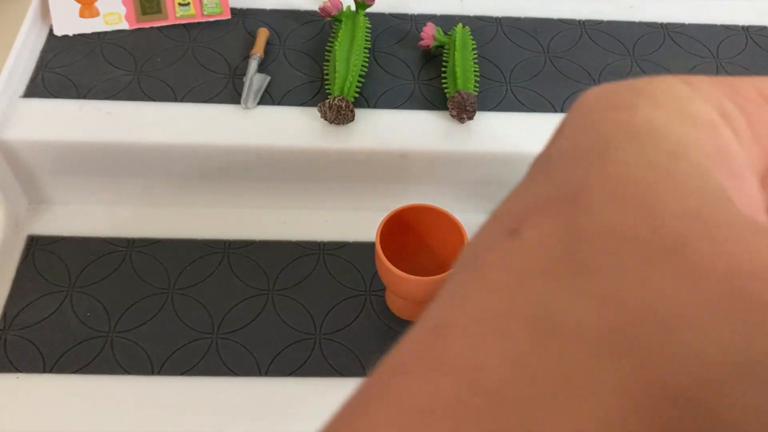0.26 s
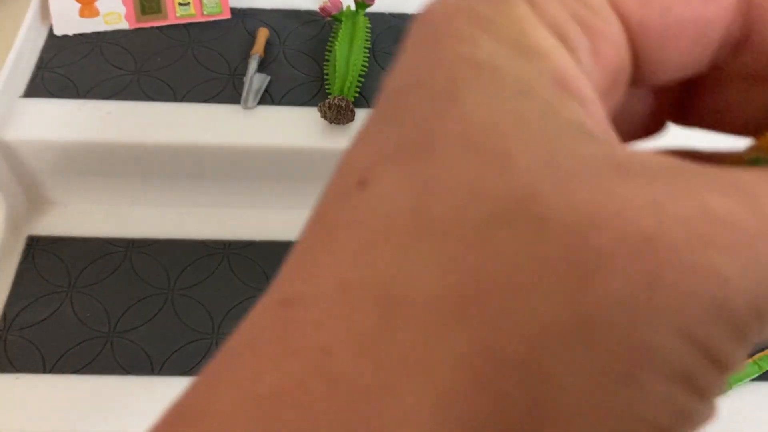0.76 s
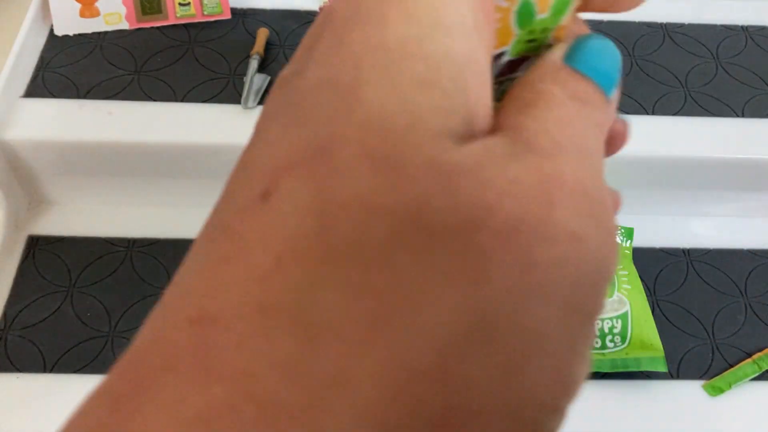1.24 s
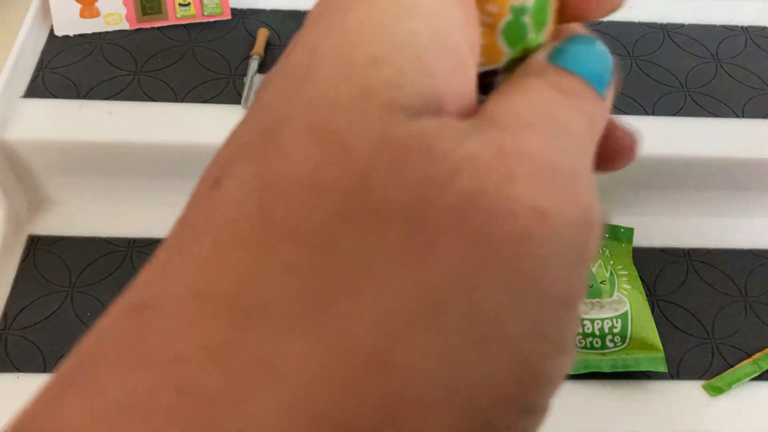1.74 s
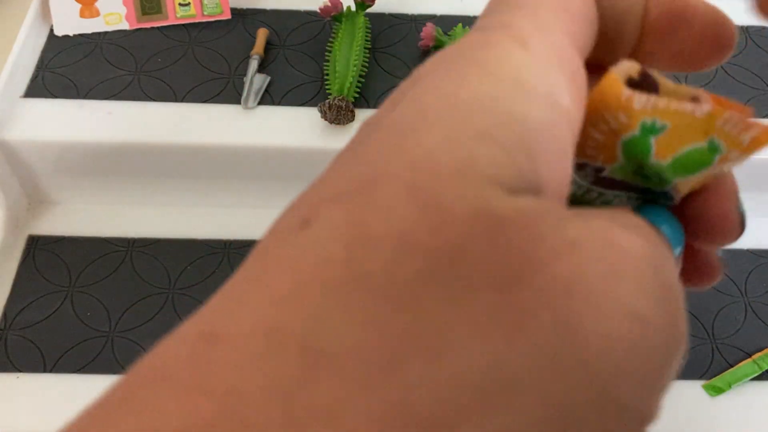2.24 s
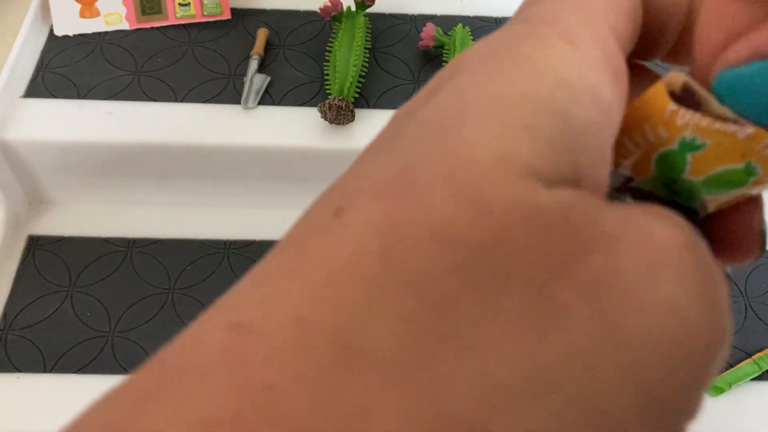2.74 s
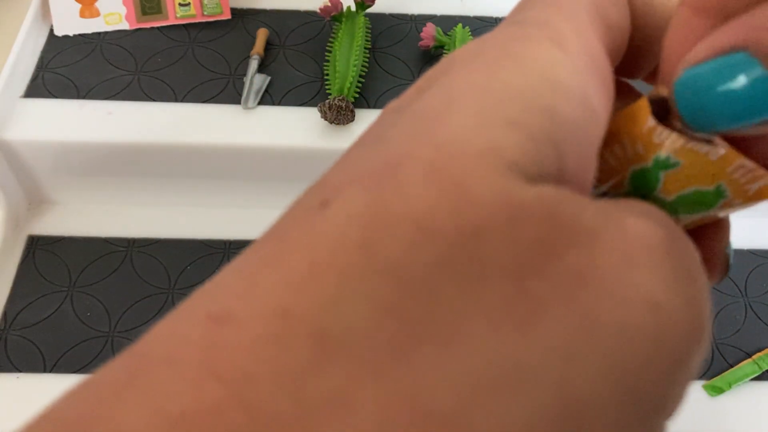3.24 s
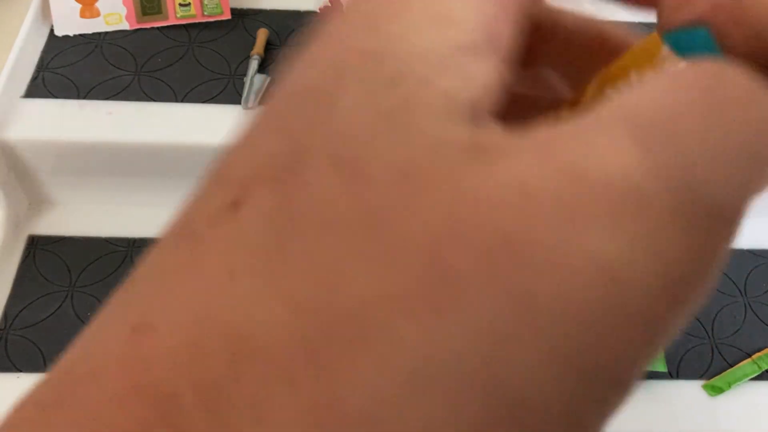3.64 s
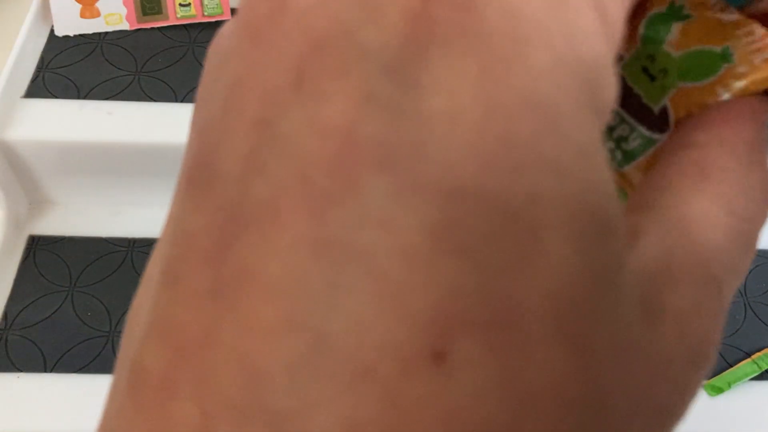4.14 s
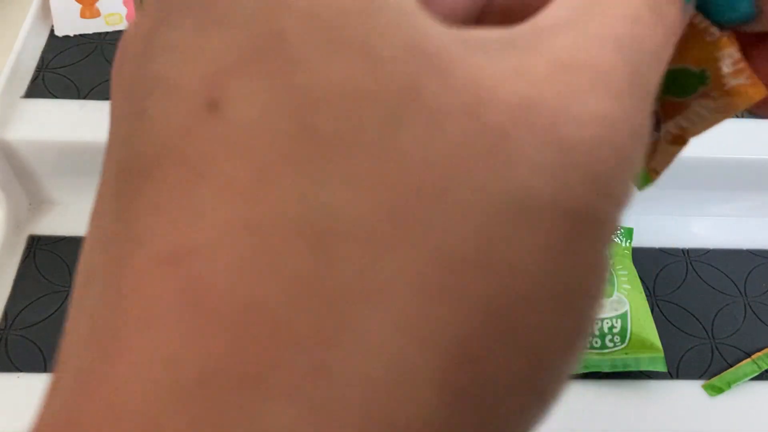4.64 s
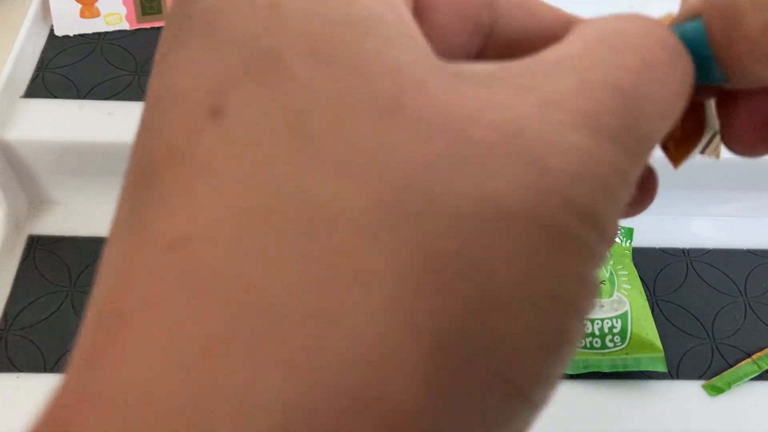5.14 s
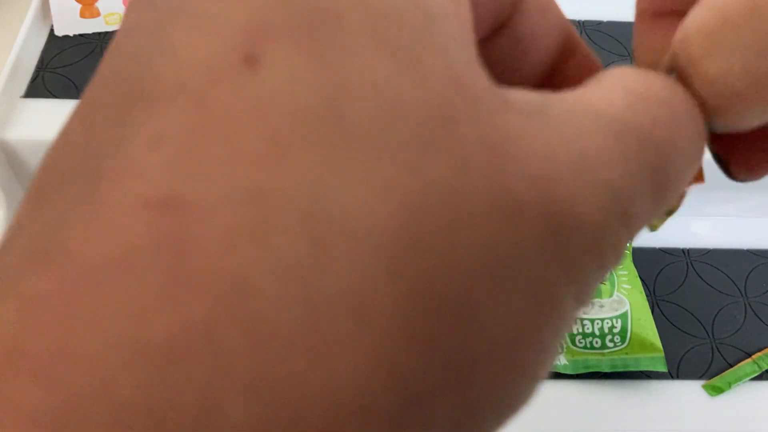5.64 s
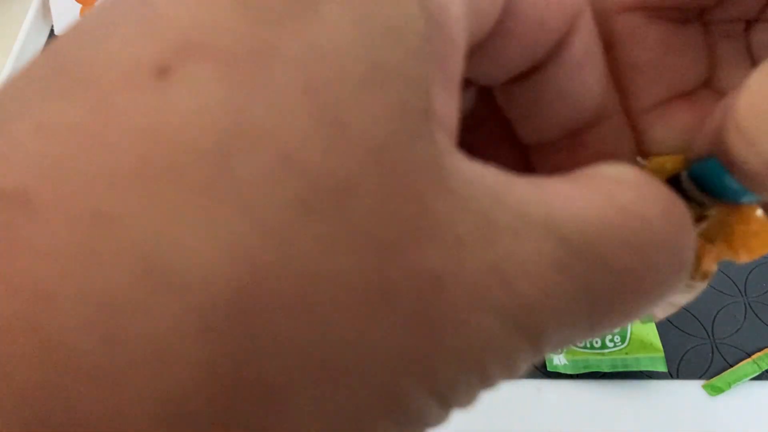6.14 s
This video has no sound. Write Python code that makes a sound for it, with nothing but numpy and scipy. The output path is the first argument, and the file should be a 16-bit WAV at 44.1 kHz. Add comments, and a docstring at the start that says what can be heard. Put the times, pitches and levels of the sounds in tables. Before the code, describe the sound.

A quiet indoor room with a low, gently swelling rumble and very faint hiss, heard by two close microphones. From 0 s fingers crease a small plastic packet: thin, bright ticks, with crisp stronger snaps near 0.1 and at 0.25-0.3 s. At about 0.73 s a hand knocks the table, the loudest event, short and woody, with a dense crackle and little scuffs until 0.9. Around 1.15-1.35 s softer bumps and scuffs mix with more rustling. From 1.4 to 2.1 s small snaps come in irregular strings. A faint soft rub passes near 2.2, a short low pop at 2.74 within a crinkle cluster. Sharp snaps gather around 3.1-3.3 and 3.6 s, then 4.1-4.65 s. A clear bright click lands at 4.97, another at 5.19; sparse dry ticks continue to the end near 6.4 s. The reflections are short and slight.

```python
"""Quiet room, two microphones: fingers work a small plastic packet close by.
Creases snap, some with an echo, as short forces ringing four groups of resonances; tiny folds rustle.
Mostly early on a hand knocks and scuffs the table; later come a soft rub and a short low pop:
shaped noise bursts wake a bank of modes. Shaped noise gives a low, swelling rumble with faint hiss;
sparse reflections add a short tail."""
import sys
import numpy as np
from scipy import signal
from scipy.fft import rfft, irfft, next_fast_len
from scipy.io import wavfile
from scipy.ndimage import uniform_filter1d

SR = 44100
rng = np.random.default_rng(int(sys.argv[2]) if len(sys.argv) > 2 else 0)


def dump(signal):
    """Clip the signal to [-1, 1] and save it as 16-bit WAV at the path in sys.argv[1]."""
    limited = np.clip(np.atleast_2d(signal).T, -1, 1)
    pcm = np.round(limited * 32767).astype(np.int16)
    wavfile.write(sys.argv[1], SR, pcm)


N = 281622

# Room noise spectrum, relative density: f/Hz, level/dB
RUMBLE_SPECTRUM = [(20, -37.5), (35, -12.5), (56, -5.5), (80, 6), (95, -4), (114, -14.5), (158, -11),
                   (300, -20), (500, -27.5), (750, -40), (1200, -43.5), (5000, -52), (8000, -48.5),
                   (12000, -54.5), (16500, -63)]
# Slow swell of the deep rumble, only departures from the mean count: t/s, level/dB
RUMBLE_SWELL = [(0, -52), (.4, -53), (1.102, -52.5), (2, -54.5), (3.001, -57), (3.202, -53.5),
                (3.601, -57.5), (4.4, -53.5), (4.998, -56.5), (5.35, -53), (6.39, -57)]
# Left-right likeness of diffuse sound: f/Hz, likeness
LIKENESS = [(60, 0.93), (240, 0.82), (950, 0.1), (3770, 0.23), (15000, 0.14)]
# Decay of the room tail: f/Hz, t60/s
ROOM_DECAY = [(500, 0.15), (2000, 0.13), (8000, 0.25), (15000, 0.067)]
# Mostly early knocks and scuffs on the table, later a soft rub and a short low pop:
# t/s, relative level/dB, burst length/ms, touch pitch f/Hz
LOW_BLOWS = [(0.503, -55.5, 9.8, 500), (0.714, -26.5, 15, 1300), (0.7254, -19, 9, 1270),
             (0.729, -17.5, 5.3, 460), (0.735, -26.5, 37, 195), (.7500, -26, 10, 83), (.7560, -35, 13, 800),
             (0.763, -42, 17, 220), (.7850, -37.5, 39, 866), (0.845, -41, 8.8, 476),
             (0.871, -40.5, 19, 74.4), (0.881, -54, 90, 490), (1.127, -52.5, 100, 567),
             (1.148, -39, 225, 75), (1.226, -38.5, 12.4, 685), (1.241, -40.5, 33, 406),
             (1.264, -35, 3.6, 880), (1.279, -41, 14.5, 278), (1.329, -47, 12.4, 680),
             (2.181, -62.5, 220, 457), (2.737, -46.5, 2.35, 406)]
# Modes of the table: f/Hz, level/dB, t60/s (limited to 0.02-0.3 in use)
TABLE_MODES = [(78.6, -13.5, 0.33), (141, -16, .12), (237, 6, 0.31), (301, 0.5, 0.054), (498, 1.5, 0.061),
               (626, -0.5, 0.034), (713, 3.5, .1), (850, -3, 0.22), (833, -8.5, 0.031), (1092, 6.5, 0.045),
               (1238, -6.5, 0.082), (1252.5, -14.5, .06), (1370, -14.5, 0.025), (1530, -11, 0.18),
               (1790, -5.5, 0.044), (2360, -0.5, 0.12)]
# Clear snaps of the film, some with an echo about 12 ms later: t/s, relative crease level/dB,
# pocket level re crease/dB, edge level re crease/dB, length/ms, pocket pitch f/Hz
SNAPS = [(0.0043, -42.5, -21, 2.5, 0.77, 1700), (0.045, -55, -21, 1, 4.9, 2000),
         (0.0637, -50, -12.5, 2.5, 6.3, 2000), (0.1139, -27, -18, -9, 5.8, 1400),
         (0.1196, -30.5, -7, 2, 3.4, 1150), (0.14, -56.5, 17, -12, 1.9, 1500),
         (0.165, -40.5, -16, 1, 1.7, 1520), (0.2403, -20.5, -31, -11, 0.37, 2270),
         (0.2877, -19.5, -18.5, -5.5, 2.7, 1490), (0.2942, -12, -23, -11.5, 6, 2370),
         (0.5026, -44, -4, -4, 15, 1370), (0.553, -50.5, -8, -12.5, 1.1, 1740),
         (0.5941, -47.5, -8.5, -10, 2.6, 1490), (0.6122, -47, -16.5, -3, 5.2, 1700),
         (0.7258, -18, -0.5, -1.5, 9.6, 1250), (0.7598, -34, 2, -16, 19, 1500),
         (0.7923, -26.5, -24, 4.5, 4, 1500), (0.8397, -32.5, -9.5, -12, 6.7, 1700),
         (0.8505, -40, -7, -19, 7.4, 1700), (1.1565, -53.5, -10.5, -1, 3.48, 1020),
         (1.2343, -32.5, -6.5, -9, 7.8, 1200), (1.2432, -32, -13, -22, 5.8, 1700),
         (1.2663, -36, 0.5, -19, 23, 1400), (1.3249, -44, -4, -24, 2.2, 1140),
         (1.3414, -36, -8.5, -12, 2.8, 1040), (1.363, -58.5, 9, -9, 2.984, 1600),
         (1.3806, -35, -3.5, -1.5, 1.2, 1820), (1.3986, -37, -1.5, -5, 1.5, 1810),
         (1.433, -47.5, 4, -1.5, 1.2, 1820), (1.535, -39, -22.5, 0, 1.3, 2420),
         (1.6292, -32, -10.5, -6.5, 2.7, 1700), (1.6338, -27, -23, -8.5, 0.84, 2260),
         (1.644, -44.5, -20.5, -7.5, 5.7, 1700), (1.7669, -54.5, 17.5, 3, 3, 1750),
         (1.7718, -40, -10.5, -7, 1.5, 1700), (1.781, -45, 2, 4, 4.1, 1700),
         (1.803, -43.5, 6, -8, 0.93, 2700), (1.8579, -49.5, 0, -6, 2.4, 1700),
         (1.8744, -40.5, -13, -3, 6.6, 2300), (1.9017, -43, -6, -3, 1.9, 1760),
         (1.975, -52, -12, -6, 2.6, 2500), (2.0191, -48, -12.5, -12, 1.6, 1700),
         (2.1075, -38.5, -15.5, -9.5, 1.4, 2600), (2.114, -29.5, -4, 3.5, 1.2, 2590),
         (2.4, -48.5, 13.5, -9, 1.3, 1300), (2.5468, -33, -22, -5.5, 1.04, 1410),
         (2.5769, -55.5, -2.5, -9, 3.4, 1030), (2.614, -37.5, -7.5, 2, 4.6, 1810),
         (2.6212, -37.5, 0, -12, 1.4, 1010), (2.6664, -50.5, -0.5, 0, 3, 2600),
         (2.677, -47, -1.5, 6.5, 1, 990), (2.6893, -50, -1, -8, 2.7, 1100), (2.727, -54, 5, -4, 3.4, 1030),
         (2.7344, -36, 10.5, 4.5, 1.3, 1860), (2.741, -29, -0.5, -2.5, 0.99, 1600),
         (2.8268, -52, -1.5, -7, 6.7, 1010), (2.89, -59.5, -3, -7, 3.08, 1700),
         (3.075, -29, -14.5, 0, 1.3, 1680), (3.0868, -31.5, -9.5, -3.5, 1.8, 1500),
         (3.108, -56.5, 13, -18.5, 2.7, 1460), (3.149, -70, 10, -8, 1.9, 1300),
         (3.1679, -42, 10.5, 0, 0.92, 1700), (3.245, -34.5, -5.5, 6, 0.67, 1050),
         (3.2565, -33.5, -9.5, -4, 2.7, 1700), (3.2898, -31.5, 5.5, -5, 1.6, 1600),
         (3.365, -59.5, -13, -4, 2, 1700), (3.508, -59.5, 4.5, -7, 4, 1620),
         (3.551, -52.5, 2.5, -22, 2.5, 1860), (3.5726, -52.5, 10, -18, 1.8, 1500),
         (3.6024, -32.5, -3.5, 7.5, 1.1, 1050), (3.607, -25, -2, -10, 1.17, 1620),
         (4.0255, -59, 2.5, -10, 2.9, 1820), (4.0998, -26, -14.5, -6, 1.2, 2360),
         (4.1913, -34, -5.5, -15, 1.16, 1810), (4.2435, -67, 13, -12.5, 1.1, 1100),
         (4.338, -36, -11.5, -9.5, 1.05, 1770), (4.3997, -57, 10.5, 5, 2.9, 1600),
         (4.4342, -58, -2, -14, 2, 1500), (4.469, -43, -3.5, 1.5, 5.7, 1270), (4.477, -40, 2, 3, 1.6, 1500),
         (4.502, -65, 6, -9, 3.3, 1600), (4.5787, -49.5, 0, -1, 3.8, 1000),
         (4.5865, -29.5, -15, -14.5, 1.5, 1700), (4.6088, -53, 11.5, 2, 1.9, 1400),
         (4.6148, -37, -22, -16.5, 2, 1710), (4.6433, -60, 12, 5, 2.75, 1600),
         (4.968, -20.5, -30, 1, 2.3, 1790), (5.1865, -29, -16.5, 0.5, 1.66, 1790),
         (5.3401, -45, 3, -0.5, 1.55, 1770), (5.707, -52, -2, -4, 2.2, 1770),
         (5.7293, -52, 5, -19.5, 2.3, 1600), (5.7493, -62, 20, -16, 0.84, 1550),
         (5.812, -61, 13.5, -16, 2.1, 1700), (5.828, -39, -14.5, -2.5, 1.6, 1670),
         (5.9757, -67.5, 16, -8.5, 2, 1600), (5.9919, -32, -15.5, 0, 1.4, 1600),
         (6.0077, -51.5, 16, -2.5, 3.6, 1500), (6.1085, -54.5, -30.5, 5.5, 2.7, 1700),
         (6.1722, -28.5, -21.5, -2.5, 1.3, 1710), (6.2407, -38, -18.5, 3.5, 2.8, 1520)]
# Finger activity: t/s, relative crackle level/dB, pocket level re crackle/dB
HANDLING = [(0, -66.5, -8), (.45, -70, -11), (.55, -62.5, -5.5), (0.698, -70.5, -10.5), (.75, -40.5, 3.5),
            (.94, -52.5, -14), (.99, -64, -16.5), (1.12, -66.5, -10.5), (1.26, -49, -5), (1.479, -73, -4),
            (1.699, -69.5, -13.5), (1.83, -53, -8), (2.08, -77, -12), (2.52, -87, -4.5),
            (2.681, -58.5, 1.5), (2.97, -91.5, -3), (3.201, -68, 1), (3.451, -87, -3.5), (3.56, -57, -3.5),
            (3.78, -99, -4.5), (4.061, -61.5, -14.5), (4.28, -73, -8), (4.47, -60.5, -3), (4.64, -77.5, 2),
            (4.79, -92, -25.5), (4.95, -68.5, -20), (5.62, -78.5, -17), (5.73, -70, -6.5),
            (6.0, -71.5, -11), (6.39, -87.5, -14)]
# Crease resonances: f/Hz, width/Hz, level/dB
CREASE_MODES = [(6500, 1500, -5), (7444, 2100, 4.5), (7440, 1300, 2.5)]
# Pocket resonances: f/pocket pitch, width/pocket pitch, level/dB
POCKET_MODES = [(1, 0.5, 3), (0.62, 0.46, -14.5)]
# Flat sheet resonances: f/Hz, width/Hz, level/dB
SHEET_MODES = [(3070, 890, 0.75), (3610, 900, 3.5), (4910, 460, 1.5)]
# Edge resonances: f/Hz, width/Hz, level/dB
EDGE_MODES = [(10465, 1000, 6.5), (11350, 1400, -4), (14520, 3000, -9.5)]
# Phase lead of the left microphone for the packet: f/Hz, lead/rad
LEFT_LEAD = [(0, -3), (1890, 1.09), (2760, 1.5), (3880, 1.49), (5080, 2), (5940, 1.29), (6460, -0.15),
             (8350, 1.23), (9730, -6.5), (10200, -4.5), (12500, -7), (14600, -12.5), (15000, -9.5),
             (16500, 8.5)]
# Balance for the packet: f/Hz, left minus right/dB
BALANCE = [(60, -3.5), (240, -2), (950, 0), (3770, 1.5), (15000, -0.5)]

RUMBLE_RMS_DB, PATCH_DB, DEEP_HZ = -54.5, 2.3, 130
FRAME, HOP = 4096, 1024  # samples
SNAP_DETUNE, FOLD_DETUNE = 0.025, 0.1  # relative standard deviation
WIDTH_FACTORS = np.array([1, 1.7])[:, None, None]  # near; all directions, where resonances blur
SHEET_SHARE, SHEET_DB = 0.62, 1.5  # the sheet partly follows the pocket level
SETTLE_DB, SETTLE_DB_PER_S = -33.5, -250  # dying crackle after each snap
PUFF_HZ = 2490  # below this mostly the jolt pushes
SMALL_HZ = 690  # a small packet radiates little below this
CRACKLES = 3200
PACKET_ROOM_DB, TABLE_ROOM_DB = -15.5, -9.0
BAND_EDGE_HZ = 16850


def gain_of(db):
    """Amplitude ratio of a level in dB."""
    return 10 ** (np.asarray(db) / 20)


def evened(x):
    """Scale to unit RMS."""
    return x / np.sqrt(np.mean(x ** 2) + 1e-20)


def read(points, hz):
    """Interpolate a table over log frequency."""
    f, value = np.transpose(points)
    return np.interp(np.log(hz + 1), np.log(f + 1), value)


def add(mix, start_s, sound):
    """Add a sound in place, cut at the end of the mix."""
    part = mix[..., round(start_s * SR):][..., :sound.shape[-1]]
    part += sound[..., :part.shape[-1]]


def puffs(length_ms, rise_ms, size, steep):
    """One noise burst per length: quick rise, then a dB fall as time to the power steep, -10 at the length."""
    t_ms = np.arange(size) / SR * 1000
    rise = 1 - np.exp(-t_ms / rise_ms)
    fall = gain_of(-10 * (t_ms / np.asarray(length_ms)[:, None]) ** steep)
    return rise * fall * rng.standard_normal((len(length_ms), size))


def rumble():
    """Room noise: lumpy, swelling bass over faint hiss, partly alike at the two microphones."""
    frames, hz = N // HOP + 5, np.fft.rfftfreq(FRAME, 1 / SR)
    a, b, c, d, patches = rng.standard_normal((frames, FRAME // 2 + 1, 5)).T
    patches = uniform_filter1d(patches, 12, 0)  # over frequency
    patches = evened(uniform_filter1d(patches, 6, 1))  # over time

    same = np.clip(read(LIKENESS, hz), -1, 1)[:, None]
    left = a + 1j * b
    right = same * left + np.sqrt(1 - same ** 2) * (c + 1j * d)

    swell_db = np.interp(np.arange(frames) * HOP / SR, *np.transpose(RUMBLE_SWELL))
    deep = 1 / (1 + (hz[:, None] / DEEP_HZ) ** 4)
    level_db = read(RUMBLE_SPECTRUM, hz)[:, None] + PATCH_DB * patches
    level_db = level_db + deep * (swell_db - swell_db.mean())
    spectrum = np.array([left, right]) * gain_of(level_db)
    noise = signal.istft(spectrum, nperseg=FRAME, noverlap=FRAME - HOP)[1][:, :N]
    return gain_of(RUMBLE_RMS_DB) * evened(noise)


def room(x):
    """Sparse reflections of random sign, each band dying at its own speed."""
    size = SR // 2
    taps = np.zeros((2, size))
    at = np.arange(200, size - 10, 10)
    at = at + rng.integers(0, 10, (2, len(at)))
    np.put_along_axis(taps, at, rng.choice([-1., 1.], at.shape), 1)
    taps *= 1 - np.exp(-np.arange(size) / SR / 0.0064)  # reflections gain strength

    hz, t, z = signal.stft(taps, SR, nperseg=256)
    same = np.clip(read(LIKENESS, hz), 0, 1)[:, None]
    z[1] = same * z[0] + np.sqrt(1 - same ** 2) * z[1]
    decay = gain_of(-60 * t / read(ROOM_DECAY, hz)[:, None])
    tail = signal.istft(z * decay, SR, nperseg=256)[1]
    return signal.fftconvolve(x, tail / np.linalg.norm(tail[0]), axes=1)[:, :N]


def table():
    """Each low blow wakes the modes unevenly and reaches the two microphones unlike."""
    start_s, blow_db, burst_ms, touch_hz = np.transpose(LOW_BLOWS)
    mode_hz, mode_db, t60_s = np.transpose(TABLE_MODES)
    size = 16384
    hz, out = np.fft.rfftfreq(size, 1 / SR), np.zeros((2, N))
    chance = rng.standard_normal((len(start_s), 3, len(TABLE_MODES)))
    unlike = 1 / (1 + (500 / mode_hz) ** 4)  # long waves reach both alike
    delay_s = np.array([[.002], [0]]) * (mode_hz > 400)  # blows land nearer the right microphone
    delay = np.exp(-2j * np.pi * hz[:, None] * delay_s[:, None])
    time_s = np.clip(t60_s, .02, .3) / np.log(1000)  # amplitude time constant

    for k, puff in enumerate(puffs(burst_ms, 1.2, size=size, steep=9.0)):
        x = 1j * hz / touch_hz[k]
        force = rfft(puff) * (x / (1 + x) ** 2) ** 4  # soft flesh pushes low, nail or knuckle higher
        f = mode_hz * (1 + 0.0078 * chance[k, 0])
        modes = 1 / (1 + 2j * np.pi * (hz[:, None] - f) * time_s)
        weights = gain_of(mode_db) * (1 - unlike + (0.17 + .45 * unlike) * chance[k, 1:])
        paths = weights[:, None] * delay
        sound = irfft(force * (paths * modes).sum(2))
        sound /= np.linalg.norm(sound, axis=1)[:, None]
        add(out, start_s[k], sound * gain_of(blow_db[k] + 10 * np.log10(SR / 40)))  # energy of 25 ms
    return out


def crackle():
    """Between clear snaps many tiny folds give way at random; a few stand out."""
    at, size, shade, tune = rng.random((CRACKLES, 4)).T
    t_s, level_db, pocket_db = np.transpose(HANDLING)
    snap_s, snap_db = np.transpose(SNAPS)[:2]
    at_s = at * (N / SR)
    since_s = at_s[:, None] - snap_s
    settling = (since_s > 0) * gain_of(snap_db + SETTLE_DB + SETTLE_DB_PER_S * abs(since_s))
    busy_db = 20 * np.log10(gain_of(np.interp(at_s, t_s, level_db)) + settling.max(1))

    fold_pocket_db = np.interp(at_s, t_s, pocket_db) + 22.0 * (shade - .5)
    crease_db = busy_db - 5.0 - 2.44 * np.log(1 - .997 * size)  # long tail of strong folds
    edge_db, length_ms = np.full(CRACKLES, -4.0), np.full(CRACKLES, 2.5)
    pocket_hz = 1100 + 900 * tune
    folds = np.transpose([at_s, crease_db, fold_pocket_db, edge_db, length_ms, pocket_hz])
    return snaps(folds, FOLD_DETUNE, size=256)


def snaps(rows, detune, size):
    """Jolt and puff of each crease or echo ring four packet parts; row 0 is near, row 1 feeds the room."""
    start_s, crease_db, pocket_db, edge_db, length_ms, pocket_hz = np.transpose(rows)
    sheet_db = SHEET_SHARE * pocket_db + SHEET_DB
    puff = puffs(length_ms, 0.7, size=size, steep=0.83)
    hz = np.fft.rfftfreq(size, 1 / SR)
    puff = rfft(puff / np.linalg.norm(puff, axis=1)[:, None]) * 1j * hz / (PUFF_HZ + 1j * hz)
    jolt = np.exp(-2j * np.pi * hz * .0006)  # 0.6 ms after the start
    radiation = (1j * hz / (SMALL_HZ + 1j * hz)) ** 2
    force = np.array([puff + 0.66 * jolt, 0.1 * puff + jolt]) * radiation

    hz = hz * (1 + detune * rng.standard_normal((len(start_s), 1)))  # every row is tuned apart
    parts = [(CREASE_MODES, 0 * start_s, 1), (POCKET_MODES, pocket_db, pocket_hz[:, None]),
             (SHEET_MODES, sheet_db, 1), (EDGE_MODES, edge_db, 1)]
    sound = 0
    for modes, part_db, unit_hz in parts:
        ring = sum(gain_of(g) / (1 + 2j * (hz / unit_hz - f) / (w * WIDTH_FACTORS)) ** 2
                   for f, w, g in modes)
        part = irfft(force * ring)
        part /= np.linalg.norm(part, axis=2)[..., None]
        sound = sound + part * gain_of(crease_db + part_db + 21.0)[:, None]  # energy of about 3 ms

    mix = np.zeros((2, N))
    for k, at_s in enumerate(start_s):
        add(mix, at_s, sound[:, k])
    return mix


def pair(x):
    """Two ports hear the packet with a phase shift and balance that vary with frequency."""
    size = next_fast_len(N)
    hz = np.fft.rfftfreq(size, 1 / SR)
    half = gain_of(read(BALANCE, hz) / 2) * np.exp(.5j * read(LEFT_LEAD, hz))
    return irfft(rfft(x, size) * np.array([half, 1 / half]), size)[:, :N]


def scene():
    """Sum the packet and low blows, each with its room tail, and the rumble."""
    near, far = snaps(SNAPS, SNAP_DETUNE, size=1024) + crackle()
    blows = table()
    packet = pair(near + gain_of(PACKET_ROOM_DB) * room(far[None]))
    blows_in_room = blows + gain_of(TABLE_ROOM_DB) * room(blows)
    return packet + blows_in_room + rumble()


def record(dry):
    """Linear-phase low-pass at the upper band edge."""
    taps = signal.firwin(511, BAND_EDGE_HZ, window=("kaiser", 9), fs=SR)
    return signal.oaconvolve(dry, taps[None], "same")


dry = scene()
out = record(dry)
dump(out)
```